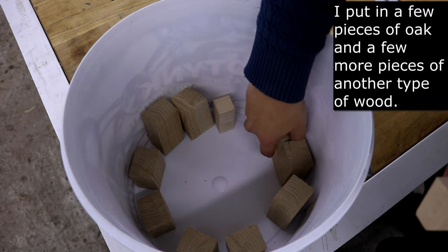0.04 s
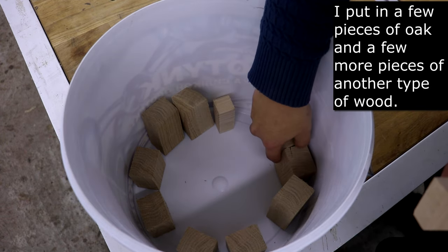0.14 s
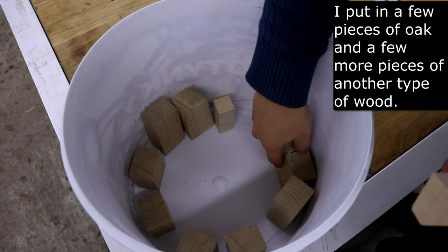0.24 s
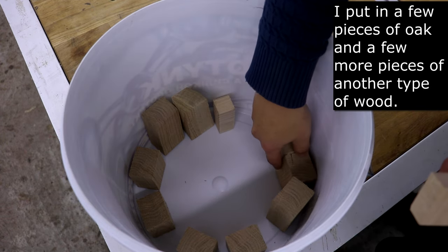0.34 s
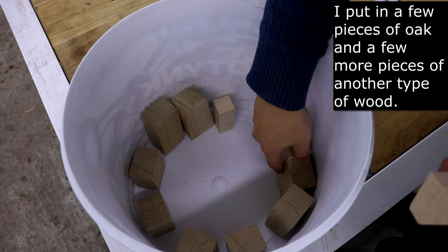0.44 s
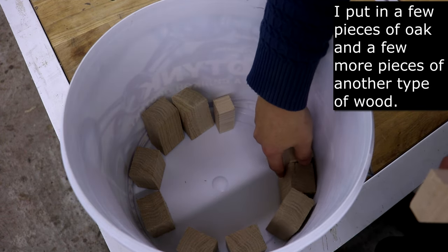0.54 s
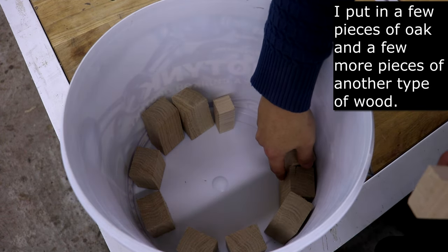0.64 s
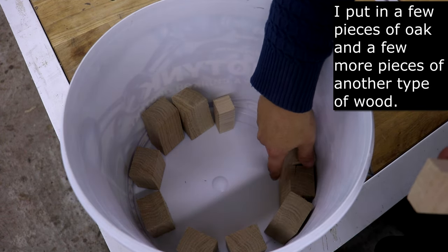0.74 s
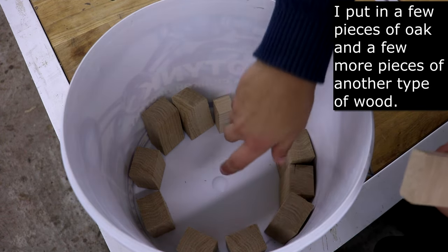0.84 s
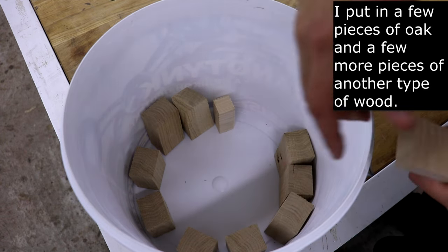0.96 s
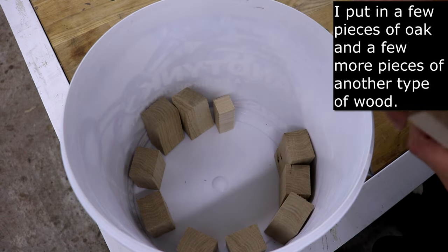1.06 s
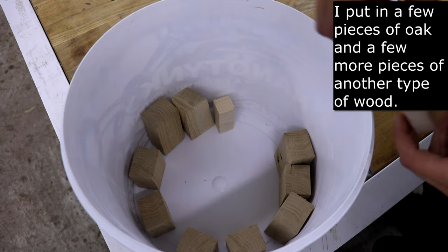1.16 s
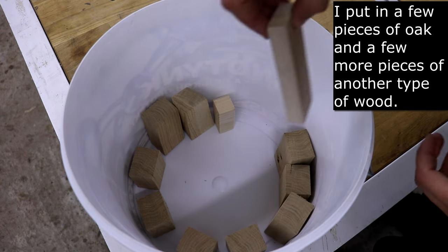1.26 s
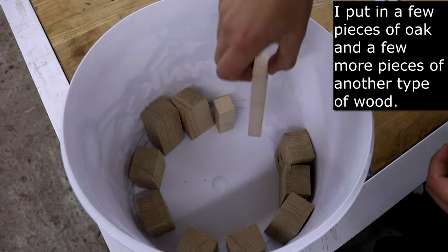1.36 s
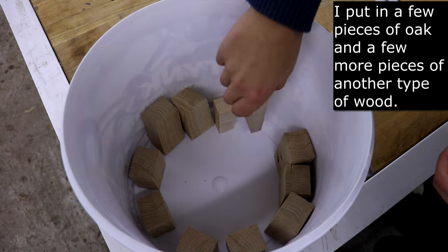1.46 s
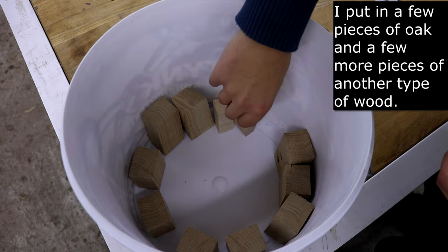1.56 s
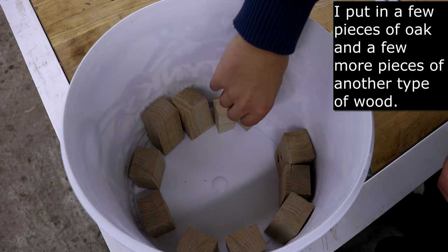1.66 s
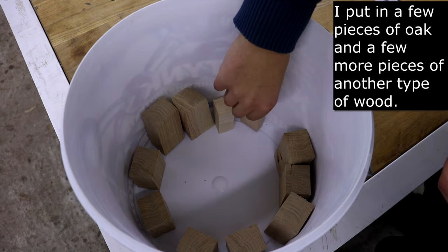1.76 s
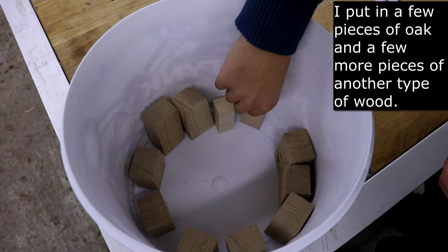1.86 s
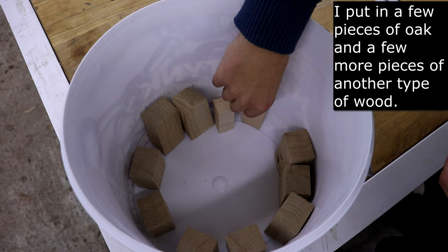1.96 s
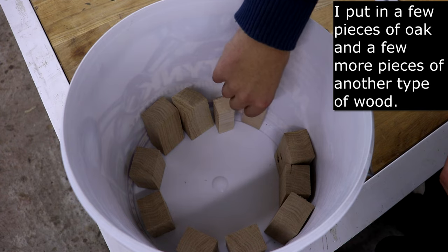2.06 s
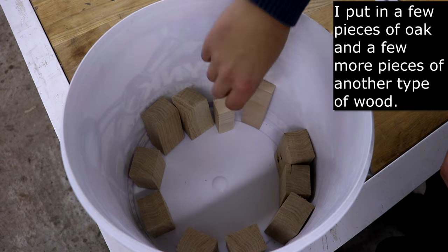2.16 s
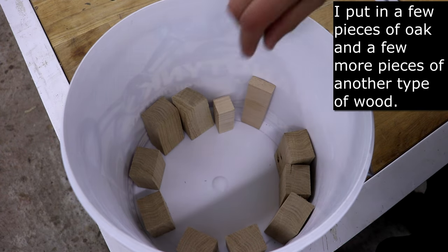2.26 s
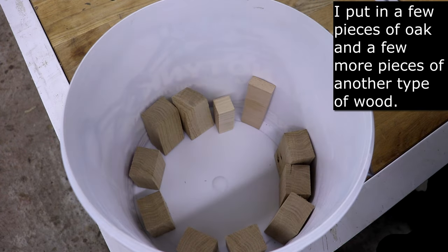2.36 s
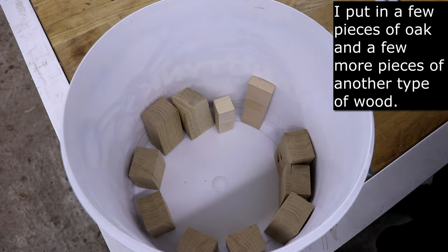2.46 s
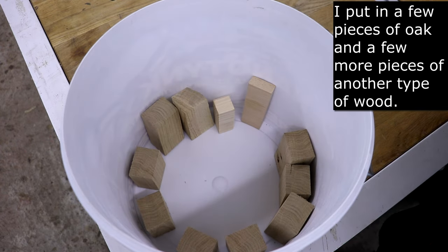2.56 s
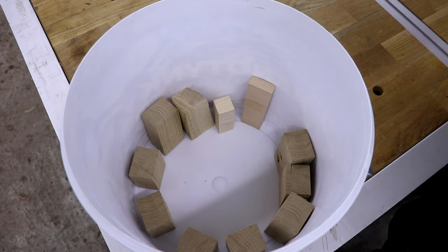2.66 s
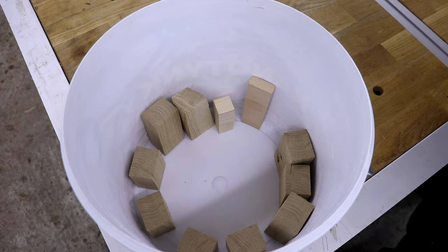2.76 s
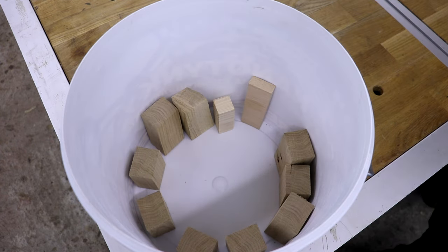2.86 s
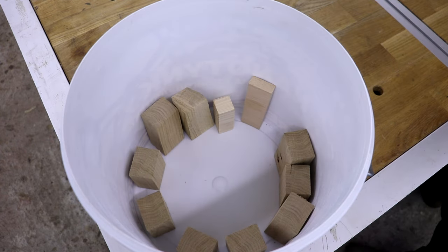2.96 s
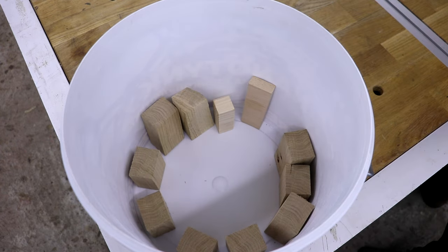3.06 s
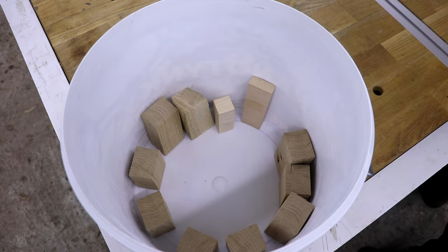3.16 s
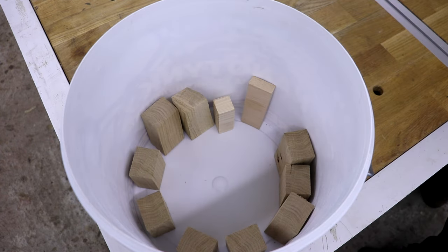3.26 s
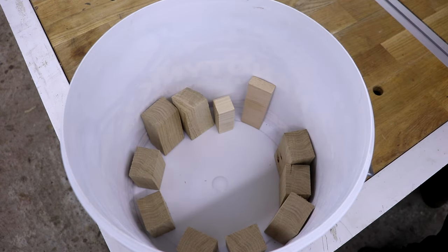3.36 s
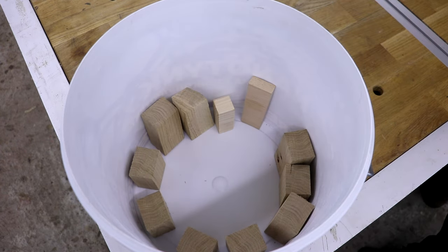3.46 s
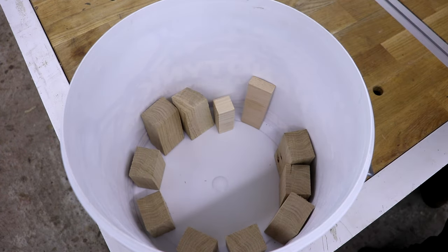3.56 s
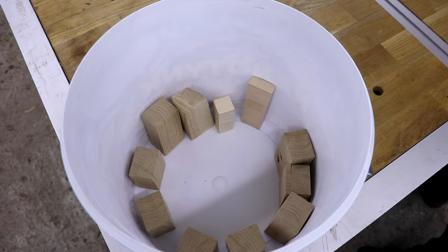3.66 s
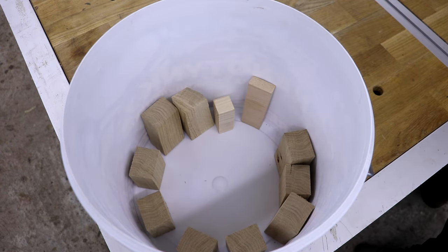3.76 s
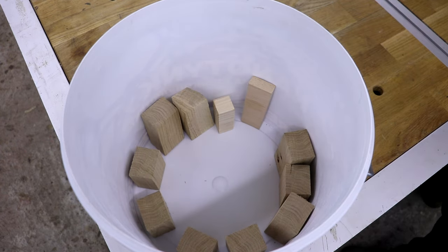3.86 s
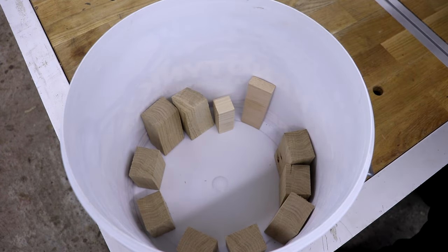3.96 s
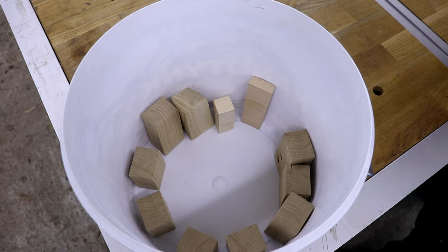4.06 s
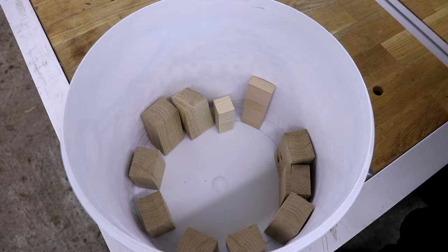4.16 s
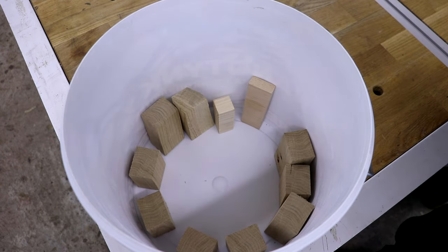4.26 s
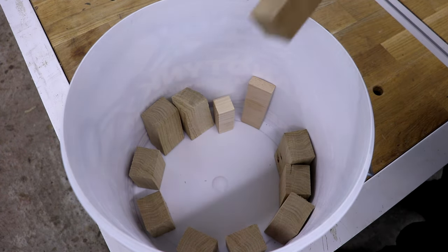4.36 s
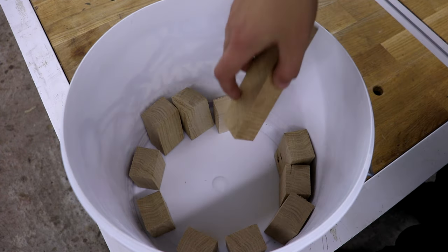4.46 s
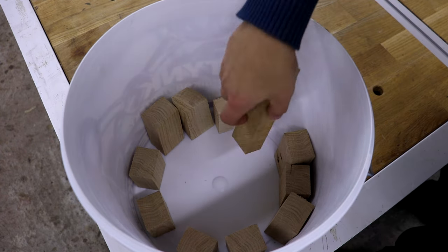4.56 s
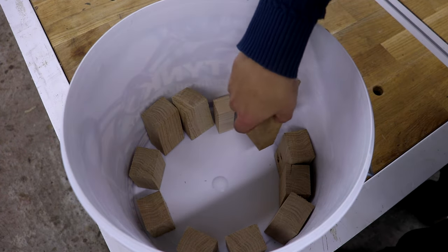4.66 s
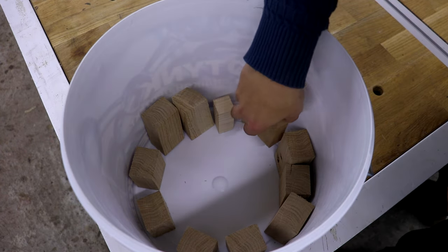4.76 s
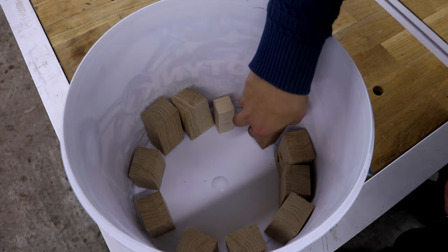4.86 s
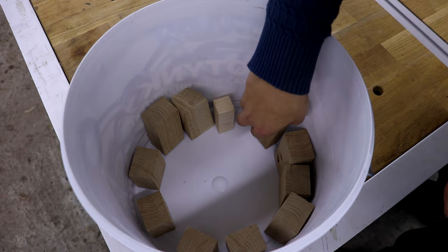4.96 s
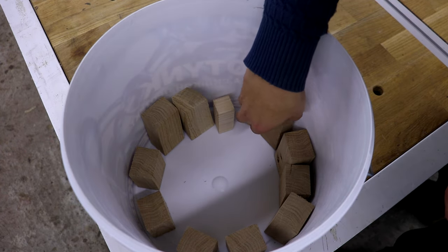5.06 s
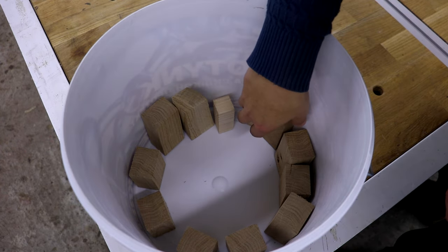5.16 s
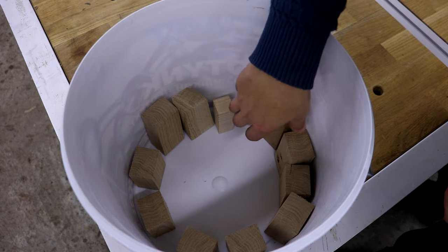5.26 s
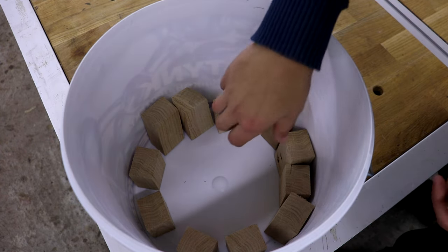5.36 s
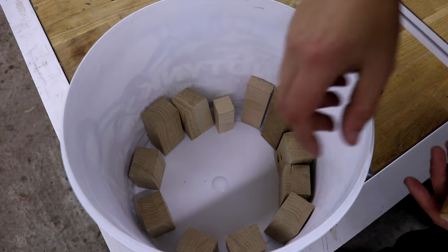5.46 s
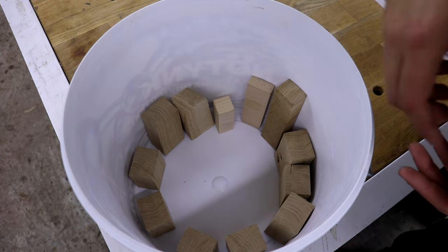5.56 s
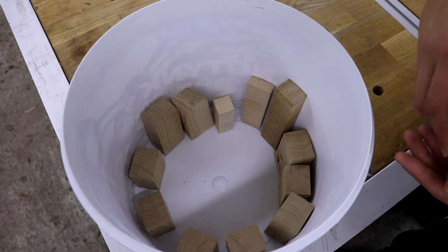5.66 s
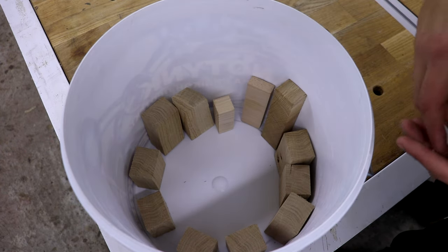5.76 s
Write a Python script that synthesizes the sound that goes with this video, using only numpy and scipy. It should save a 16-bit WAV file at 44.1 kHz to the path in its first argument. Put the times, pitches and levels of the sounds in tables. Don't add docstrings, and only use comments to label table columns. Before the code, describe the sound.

Small wooden blocks scrape, squeak and knock inside a plastic bucket in a workshop, with hollow booms, dull bench thuds and room echo.

```python
import sys
import numpy as np
from scipy import signal
from scipy.fft import rfft, irfft
from scipy.io import wavfile
from scipy.ndimage import uniform_filter1d

SR = 44100
rng = np.random.default_rng(int(sys.argv[2]) if len(sys.argv) > 2 else 0)


def field_ratio(decibels):
    return 10 ** (np.asarray(decibels, dtype=float) / 20)


def generate_wav(signal):
    frames = np.transpose(np.atleast_2d(signal))
    scaled = np.clip(frames, -1, 1) * 32767
    pcm = np.round(scaled).astype(np.int16)
    wavfile.write(sys.argv[1], SR, pcm)


N = 256220

# pitch in Hz, width in Hz, level in dB.
BUCKET_MODES = [(157.4, 37, -12), (252, 49, 0), (294.7, 91, -1.5), (380.3, 57, 6), (475.4, 120, -4.5)]
# pitch in Hz, width in Hz, level in dB.
WALL_MODES = [(1100, 110, 0), (1550, 250, 1), (2050, 90, -11), (2500, 590, -15.5), (3400, 380, -13),
              (4900, 2100, -13.5)]


def evened(x):
    return x / np.sqrt(np.mean(x ** 2) + 1e-20)


def peaked(x):
    return x / abs(x).max()


def read(points, hz):
    f, value = np.transpose(points)
    return np.interp(np.log(hz + 1), np.log(f + 1), value)


def add(mix, s, sound):
    part = mix[max(round(s * SR), 0):][:len(sound)]
    part += sound[:len(part)]


def ring(x, modes):
    out = np.zeros(len(x))
    for k, (hz, width, db) in enumerate(modes):
        r = np.exp(-np.pi * width / SR)
        poles = [1, -2 * r * np.cos(2 * np.pi * hz / SR), r * r]
        out += (-1) ** k * field_ratio(db) * (1 - r) * signal.lfilter([1, 0, -r], poles, x)
    return out


def glide(x, hz, width):
    turn = np.exp(2j * np.pi * np.cumsum(hz) / SR)
    r = np.exp(-np.pi * width / SR)
    return evened((turn * signal.lfilter([1 - r], [1, -r], x / turn)).real)


def coloured(x, points):
    return irfft(rfft(x) * field_ratio(read(points, np.fft.rfftfreq(len(x), 1 / SR))), len(x))


def grit(per_s, spread_db):
    size = field_ratio(spread_db * np.minimum(rng.exponential(1, N), 4)) * rng.standard_normal(N)
    return evened(size * (rng.random(N) < per_s / SR))


def burst(noise, ms):
    x = noise * np.exp(-np.arange(len(noise)) / SR / (max(ms, .15) / 1000))
    x[0] = 3.7
    return peaked(x)


def strokes(rows, start_db, end_db, sag=0):
    t, gain, pitch = np.arange(N) / SR, np.zeros(N), np.zeros(N)
    for top, rise, fall, db, *hz in rows:
        inside = (t >= top - rise) & (t < top + fall)
        under_db = np.interp(t[inside], [top - rise, top, top + fall], [start_db, 0, end_db])
        gain[inside] += field_ratio(db + under_db)
        pitch[inside] = sum(hz) * (1 + sag * under_db)
    return uniform_filter1d(gain, size=130), pitch


def floor():
    # frequency in Hz, level in dB per Hz.
    air_spectrum = [(15, -45), (25, -18.5), (50, -19), (110, -18.5), (220, -21), (480, -22), (790, -26.5),
                    (5270, -34.5), (15200, -39), (15900, -53), (16500, -72.5)]
    # pitch in Hz, wander in Hz, level in dB.
    motor_tones = [(74, 0.65, -62.5), (563, 17, -76), (1360, 15, -81.5)]
    air = evened(coloured(rng.standard_normal(N), air_spectrum))
    slow = uniform_filter1d(rng.standard_normal(N), size=3000)
    wander = evened(uniform_filter1d(slow, size=3000))
    hum = np.zeros(N)
    for k, (hz, wander_hz, db) in enumerate(motor_tones):
        pitch = hz + wander_hz * np.roll(wander, 40000 * k + 9000)
        tone = np.sqrt(2) * np.sin(2 * np.pi * np.cumsum(pitch) / SR)
        hum += field_ratio(db + .7 * wander) * tone
    return field_ratio(-63.5) * air + hum


def shop(x, build_s, far_wall, length):
    # frequency in Hz, time to fall by 60 dB in seconds.
    ring_times = [(100, 0.35), (300, 0.54), (1000, 0.6), (2500, 0.63), (6000, 0.47), (12000, 0.23)]
    taps = np.zeros(SR)
    at = np.arange(200, SR - 20, 16) + rng.integers(0, 16, (SR - 205) // 16)
    taps[at] = rng.choice([-1., 1.], len(at))
    hz, t, z = signal.stft(taps, SR, nperseg=256)
    decay = field_ratio(-60 * t / length / read(ring_times, hz)[:, None])
    tail = signal.istft(z * decay, SR, nperseg=256)[1][:SR]
    t = np.arange(SR) / SR
    tail *= 1 - np.exp(-t / build_s)
    tail *= 1 + far_wall * np.exp(-((t - .105) / 0.014) ** 2)
    return signal.fftconvolve(x, tail / np.linalg.norm(tail))[:N]


def thuds():
    # start in seconds, peak in dB, bench boom in dB above the peak,
    # dullness corner in Hz, contact in ms.
    set_down = [(.833, -50, 22, 900, 2.8), (1.021, -56, 5.5, 920, 3), (1.661, -54.5, 7.5, 900, 3),
                (1.843, -42, 8, 1500, 3.6), (3.178, -46, -19, 4500, 2.2), (3.859, -64.5, 15, 900, 4),
                (2.741, -46, -4, 1390, 3.5), (2.764, -48.5, -6, 1100, 6.5), (3.094, -35, -17, 1660, 6.1),
                (3.135, -41.5, -14, 1800, 4), (3.17, -36, -20, 1500, 1.2), (3.682, -34, 4.5, 2380, 12),
                (3.702, -22.5, -15.5, 2160, 4.8), (3.716, -33.5, 5, 3000, 3.4),
                (3.716, -42.5, -40, 8900, 3.3), (4.11, -33.5, -21, 1744, 1.7), (4.15, -41.5, -2, 1700, 2.3),
                (4.17, -45.5, -27, 1720, 1.6)]
    # pitch in Hz, width in Hz, level in dB.
    bench_modes = [(172, 17.5, 0), (380, 112, -12.5), (556, 45, -3.5), (756, 99, -8.5), (1300, 200, -7.5)]
    mix, boom = np.zeros((2, N))
    for s, db, boom_db, hz, ms in set_down:
        noise = rng.standard_normal((2, 12000))
        touch = burst(noise[0], ms)
        body = 0.28 * touch + ring(touch, bench_modes[1:]) * 4.3
        band = signal.butter(2, [0.2 * hz, hz], "band", fs=SR, output="sos")
        dull = signal.sosfilt(band, body)
        add(mix, s, field_ratio(db) * (peaked(dull) + field_ratio(-30) * touch))
        low = ring(burst(noise[1], 11.9), bench_modes[:1])
        add(boom, s, field_ratio(db + boom_db) * peaked(ring(low, [(198.7, 130, 0)])))
    return mix, boom


def sleeve():
    # fastest moment, rise and fall in seconds, level in dB, centre in Hz.
    moves = [
        (2.86, 0.11, 0.13, -57, 1600),
        (3.38, .13, .12, -62, 1360),
        (4.32, .08, 0.14, -56, 1190),
        (4.446, 0.1, 0.2, -51, 1300),
        (4.76, .14, .1, -57, 1800),
    ]
    gain, hz = strokes(moves, -12.5, -13, sag=.004)
    return gain * coloured(glide(grit(13000, 0.81), hz, 1500), [(5000, -1), (15000, -3.5)])


def fingers():
    # firmest moment, rise and fall in seconds, level in dB.
    rubs = [(1.045, .005, 0.034, -62.5), (1.093, .011, 0.053, -56.5), (1.15, .01, 0.045, -56),
            (1.195, .03, 0.013, -52), (1.5, .015, 0.014, -58.5), (1.59, .008, 0.013, -63),
            (1.635, .012, 0.037, -54.5), (1.692, .018, 0.011, -62), (1.77, .015, 0.027, -68),
            (1.838, .045, 0.018, -48.5), (1.87, .02, 0.018, -48.5), (2.38, .06, .03, -66),
            (2.512, .03, .013, -60.5), (4.42, .012, 0.13, -59), (4.645, .045, 0.023, -61)]
    # firmest moment, rise and fall in seconds, level in dB.
    grips = [
        (4.08, 0.028, .02, -69),
        (4.76, 0.013, 0.0089, -62),
        (4.905, .06, .012, -54),
    ]
    # pitch in Hz, width in Hz, level in dB.
    small_block = [(4400, 230, -6), (5696, 350, -2.5), (7960, 240, -5.5), (9000, 200, -8), (10250, 380, -8)]
    # pitch in Hz, width in Hz, level in dB.
    big_block = [(2590, 56, -1.5), (3090, 210, -11), (5160, 420, -10), (6430, 230, -7), (7400, 740, -10)]
    out = np.zeros(N)
    for rows, block in [(rubs, small_block), (grips, big_block)]:
        damped = [(hz, 1.9 * width, 0) for hz, width, db in block]
        skin = ring(ring(grit(9000, 1.9), block), damped)
        out += strokes(rows, -15, -15)[0] * evened(skin)
    return out


def slides():
    # fastest moment, rise and fall in seconds, hiss in dB, squeak in Hz.
    drags = [(.052, .05, 0.01, -45.5, 2170), (.105, 0.055, 0.033, -34.5, 2100),
             (.19, 0.027, 0.18, -49, 2500), (.311, .056, .045, -41.5, 3300), (.412, 0.0082, .03, -48, 2100),
             (.461, .04, 0.15, -40, 2070), (.55, 0.062, 0.033, -48.5, 1910),
             (.615, 0.032, 0.089, -39, 2820), (.778, 0.0055, 0.0094, -66.5, 1800),
             (.836, 0.018, 0.0064, -48, 1880), (.868, 0.011, 0.01, -50, 1770)]
    # hardest moment, rise and fall
    # in seconds, boom in dB.
    pushes = [(.012, 0.011, 0.06, -29), (.098, 0.015, 0.018, -34), (.146, 0.029, 0.0078, -13.5),
              (.187, 0.037, 0.055, -17), (.27, 0.026, 0.048, -31), (.325, .012, 0.049, -32),
              (.43, .027, 0.03, -35), (.52, 0.076, 0.21, -36), (.645, 0.0093, 0.061, -24.5),
              (.785, 0.021, 0.084, -33), (.84, 0.0062, 0.039, -25), (.88, .012, 0.028, -26.5),
              (.92, 0.017, 0.079, -37), (1.67, 0.025, 0.055, -43), (5.21, 0.089, 0.085, -35)]
    gain, hz = strokes(drags, -12.5, -20, sag=0.018)
    shove = strokes(pushes, -8, -16.5)[0]
    slips = grit(4000, 2.5)
    grain = evened(ring(slips, WALL_MODES)) + glide(slips, hz, 1200)
    hiss_spectrum = [(2000, -4.0), (4400, 2.5), (6200, -5), (9000, -10.0), (15000, -26), (16000, -31.5)]  # (Hz, dB)
    hiss = evened(coloured(grit(9000, 0.83), hiss_spectrum))
    shakes = grit(3000, 1.7)
    boom = ring(shove * shakes, BUCKET_MODES) / np.std(ring(shakes[:SR], BUCKET_MODES))
    grain_gain = field_ratio(-0.5) * gain + field_ratio(-19.5) * shove
    return 1.35 * gain * hiss + grain_gain * grain + field_ratio(-6.5) * boom


def squeak():
    # fastest moment, rise and fall in seconds, level in dB, pitch in Hz.
    chatter = [
        (.03, .008, .014, -31.5, 2100),
        (.05, 0.0063, .008, -21.5, 2260),
        (.068, 0.0053, .03, -29.5, 2270),
        (.096, 0.0071, .012, -31, 2050),
        (.143, 0.049, .01, -35, 1870),
        (.46, 0.027, .07, -37.5, 1860),
        (.542, 0.022, .028, -38.5, 1770),
    ]
    gain, hz = strokes(chatter, -8, -11)
    return field_ratio(7) * gain * glide(glide(grit(2300, 3.1), hz, 630), hz, 560)


def knocks():
    # start in seconds, peak in dB, bucket boom in dB
    # above the peak, wood pitch in Hz, contact in ms.
    settling = [(1.619, -30.5, 3.5, 1100, 5.2), (1.794, -18.5, -6.5, 1000, 3.4), (1.844, -9, -6, 2050, 4),
                (1.85, -20, -13.5, 4386, 2.2), (1.891, -11.5, -22, 1325, 2.7), (1.915, -5, -9, 2750, 1.85),
                (1.924, -10.5, -15.5, 1410, 2.2), (1.936, -26, 9, 3470, 0.95), (1.927, -24, -17, 4540, .8),
                (1.968, -15, -3.5, 1100, 0.5), (2.069, -30, 0.5, 1100, 1.2), (2.083, -35.5, 10, 864, 2.1),
                (4.919, -2, -8, 2070, 3.1), (4.95, -9, -8.5, 2540, 1.1), (5.11, -13, -5, 2270, 2.5),
                (5.14, -19, -3, 1850, 1.05), (5.16, -29.5, 9.5, 1190, 2.2), (5.201, -40, 15.5, 1490, 1.1)]
    # start in seconds, peak in dB, bucket boom in dB
    # above the peak, wood pitch in Hz, contact in ms.
    rebounds = [
        (4.923, -5, -24, 4900, 1.7),
        (4.927, -14.5, -18, 2000, 1.5),
    ]
    # start in seconds, peak in dB,
    # bucket boom in dB above the peak, wood pitch in Hz.
    jostles = [(.005, -34.5, 10, 1300), (.025, -40, -10, 2050), (0.045, -29, -30, 2430),
               (0.0489, -23, -25, 2250), (0.092, -23, 7.5, 2110), (.136, -17, -1, 3070),
               (.171, -19.5, -9, 3250), (.21, -26, -19, 3540), (0.303, -22.5, -24, 3450),
               (.311, -24, -26, 4400), (.315, -30.5, 3.5, 1060), (0.454, -39, -35, 1760),
               (.631, -19.5, -2.5, 800), (.78, -42.5, 1, 7300), (0.809, -43, -14, 2220),
               (0.831, -33, 5, 2050), (.856, -32, -1, 4340), (.867, -23, -2, 1570),
               (.913, -33.5, -3.5, 1300), (1.142, -38, -13.5, 5600), (3.449, -44.5, -14, 6840)]
    # frequency in Hz, level in dB per Hz.
    tick_spectrum = [(1500, -30.5), (2500, -10), (4600, -5), (6500, -1), (9000, -18), (14500, -32),
                     (16000, -43)]
    # frequency in Hz, level in dB.
    knock_to_room = [(100, -18), (200, -2), (370, 4), (700, -8.5), (1150, -2.5), (1600, -9), (5000, -25),
                     (9000, -47), (14000, -52)]
    # frequency in Hz, level in dB.
    tick_to_room = [(1000, -43), (2500, -20.5), (5000, -16.5), (9000, -22), (14000, -47)]
    jostle_ms = 1.8
    mix, blows, t = np.zeros(N), np.zeros((2, N)), np.arange(6000) / SR
    push = peaked(t * np.exp(-t / 0.00072) * np.cos(2 * np.pi * 60 * t))
    for row in [(*row, jostle_ms) for row in jostles] + settling + rebounds:
        s, db, boom_db, hz, ms = row
        tick_db = -16 + 2 * np.log2(hz / 2100)
        noise = rng.standard_normal((3, 6000))
        touch = burst(noise[0], ms)
        wood = ring(touch, [(hz, 380, 0), (hz * 0.65, 300, -12), (1150, 300, -10)])
        wood += field_ratio(tick_db + 7) * ring(touch, WALL_MODES)
        soft_edge = signal.butter(2, min(3.5 * hz, .4 * SR), fs=SR)
        wood = peaked(signal.lfilter(*soft_edge, wood))
        tick = peaked(coloured(noise[1], tick_spectrum) * np.exp(-t / (1.1 * max(ms, .15) / 1000)))
        boom = peaked(ring(burst(noise[2], 16.0) + 0.63 * np.exp(-t / 0.00026), BUCKET_MODES))
        gain = field_ratio(db + 0.65 * max(db + 14.0, 0))
        shaken = field_ratio(boom_db) * (boom + field_ratio(-30) * push) + field_ratio(-20) * push
        add(mix, s, gain * (wood + field_ratio(tick_db) * tick + shaken))
        if row not in rebounds:
            blows[:, round(s * SR)] += gain * field_ratio(np.array([0, tick_db]))
    return mix, coloured(blows[0], knock_to_room) + coloured(blows[1], tick_to_room)


def scene():
    hits, splash = knocks()
    drag = slides() + squeak()
    far, bench = thuds()
    wet = shop(field_ratio(20.5) * splash + field_ratio(-18.5) * drag, build_s=0.0022, far_wall=0.89, length=0.99)
    wet += shop(far + field_ratio(-7.5) * bench, build_s=0.0017, far_wall=0.017, length=0.88)
    return (hits + drag + far + bench + wet + fingers() + sleeve() + floor())[None]


def low_pass(x):
    return signal.sosfilt(signal.butter(12, 16810, fs=SR, output="sos"), x)


def record(dry):
    dry = signal.sosfilt(signal.butter(2, 45, "high", fs=SR, output="sos"), dry)
    power = uniform_filter1d(dry[0] ** 2, size=88, origin=43)
    level_db = 10 * np.log10(abs(power) + 1e-12)
    fall = np.arange(N) * 130.0 / SR
    held_db = np.maximum.accumulate(level_db + fall) - fall
    over_db = np.maximum(held_db + 22, 0)
    late_db = uniform_filter1d(over_db, size=261, origin=130)
    return low_pass(np.clip(dry / field_ratio(0.49 * late_db), -.39, .39))


dry = scene()
out = record(dry)
generate_wav(out)
```